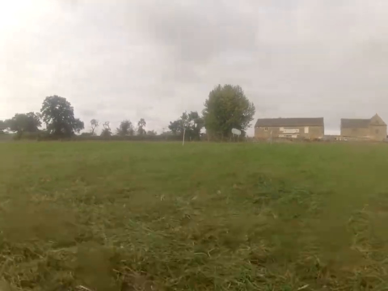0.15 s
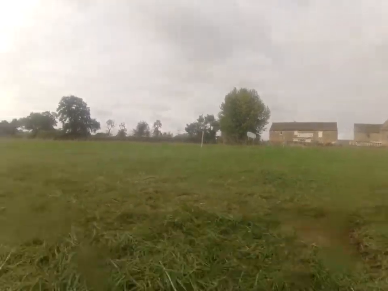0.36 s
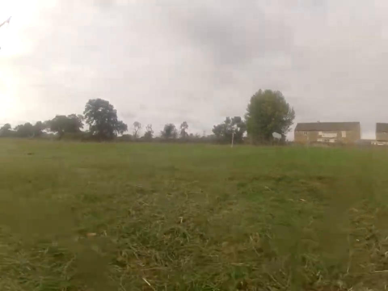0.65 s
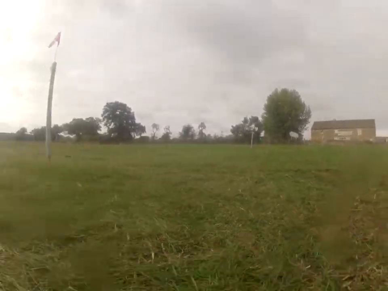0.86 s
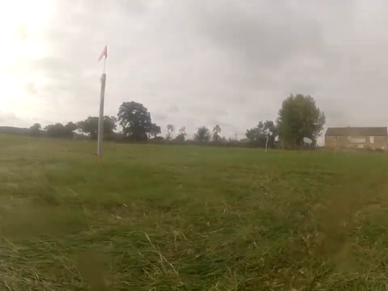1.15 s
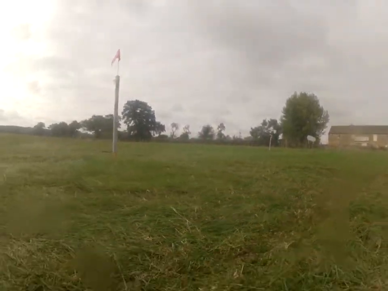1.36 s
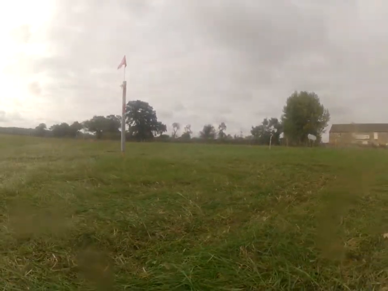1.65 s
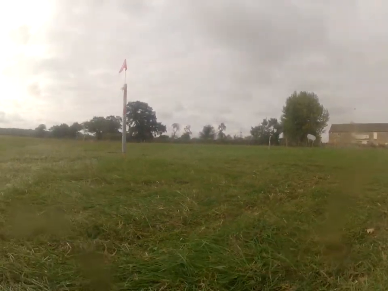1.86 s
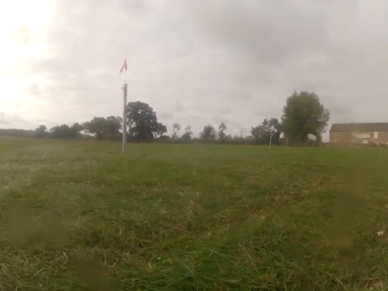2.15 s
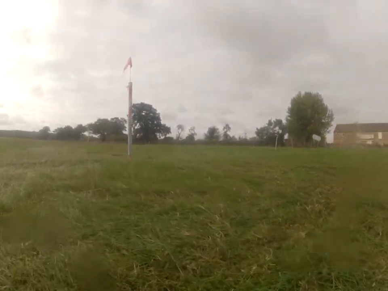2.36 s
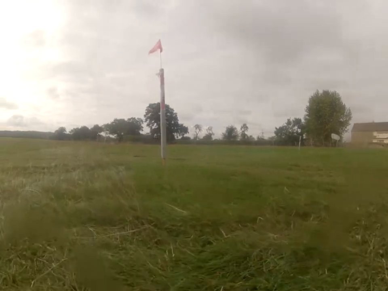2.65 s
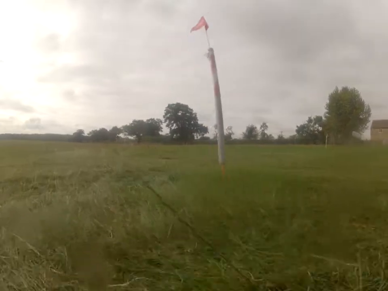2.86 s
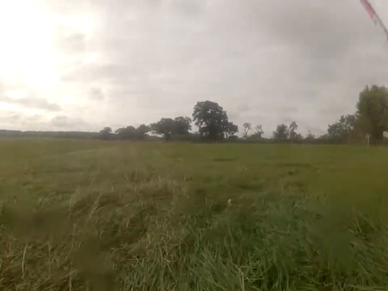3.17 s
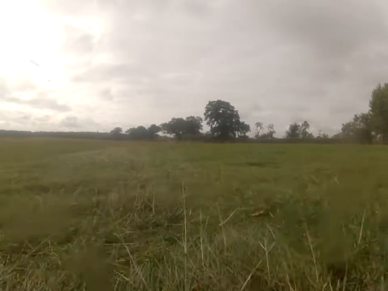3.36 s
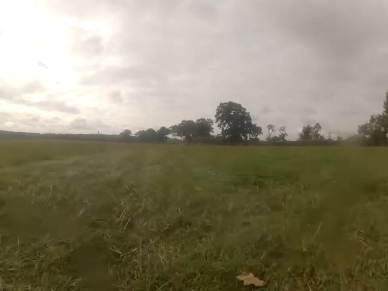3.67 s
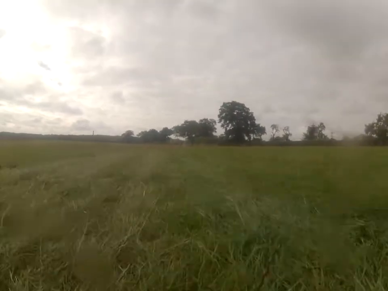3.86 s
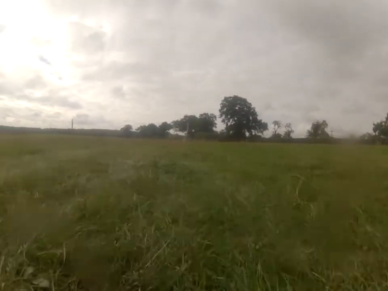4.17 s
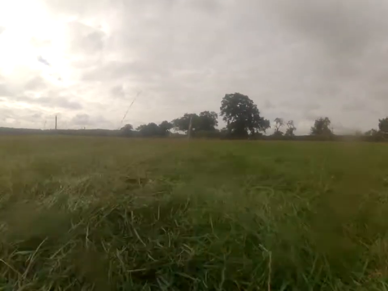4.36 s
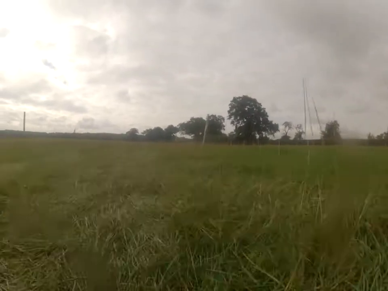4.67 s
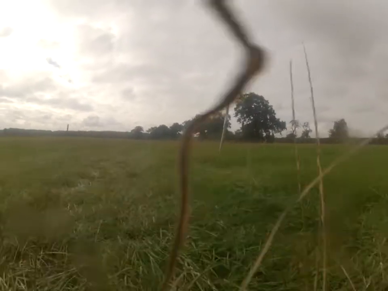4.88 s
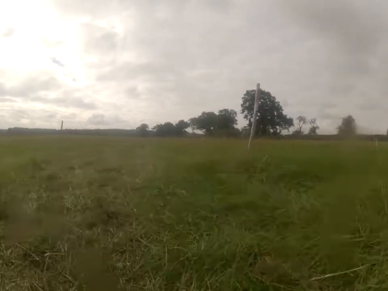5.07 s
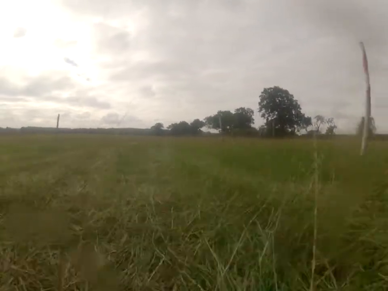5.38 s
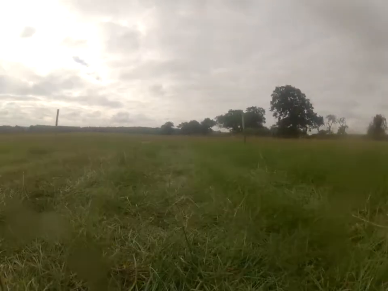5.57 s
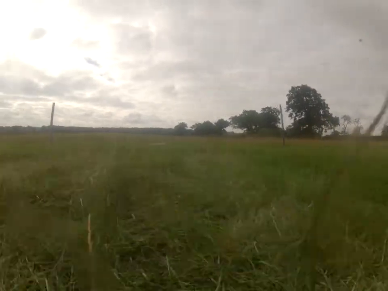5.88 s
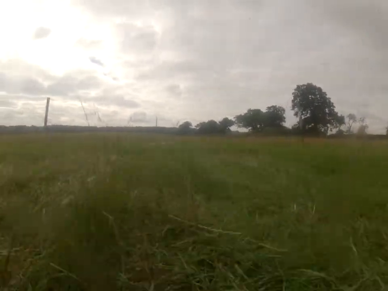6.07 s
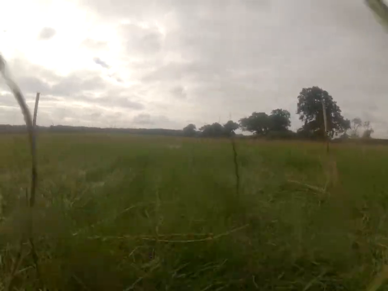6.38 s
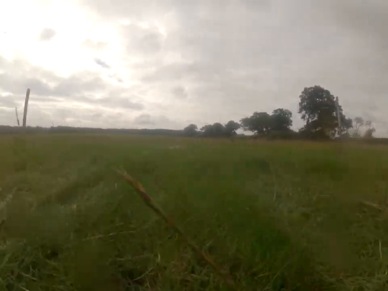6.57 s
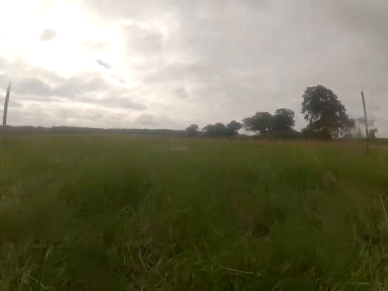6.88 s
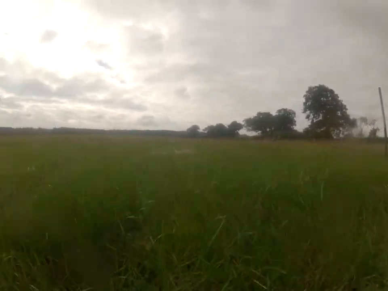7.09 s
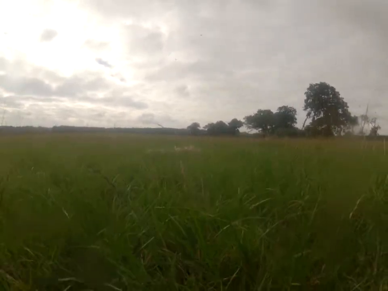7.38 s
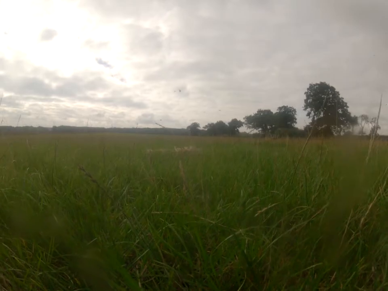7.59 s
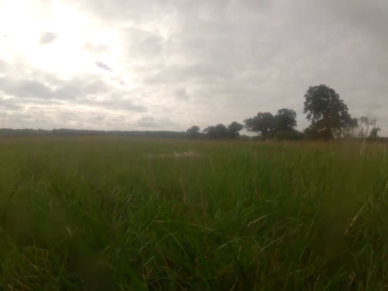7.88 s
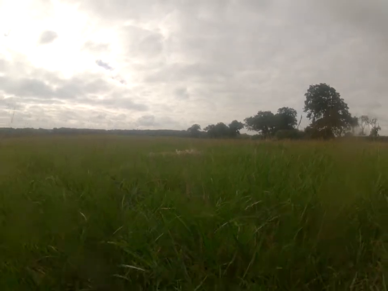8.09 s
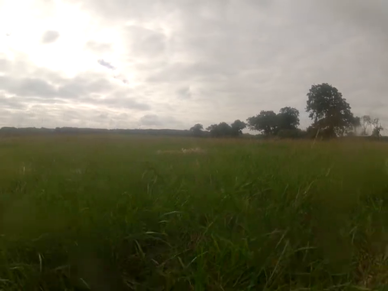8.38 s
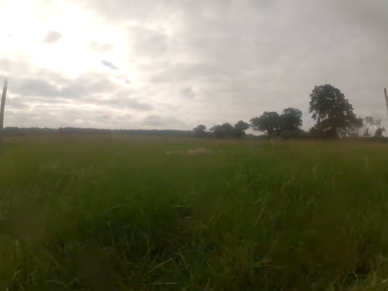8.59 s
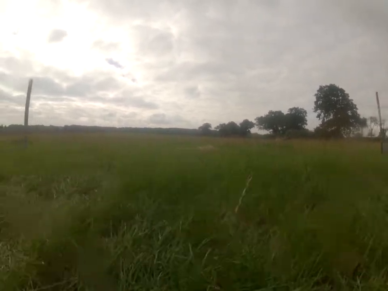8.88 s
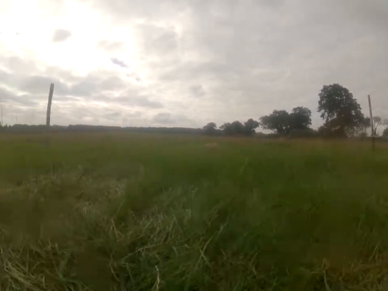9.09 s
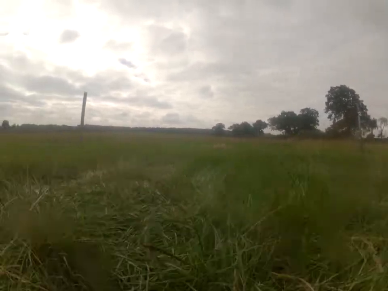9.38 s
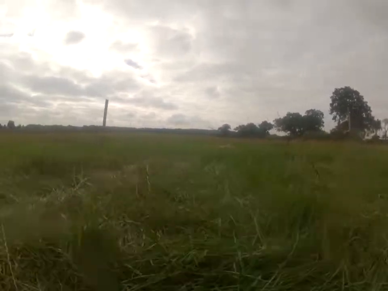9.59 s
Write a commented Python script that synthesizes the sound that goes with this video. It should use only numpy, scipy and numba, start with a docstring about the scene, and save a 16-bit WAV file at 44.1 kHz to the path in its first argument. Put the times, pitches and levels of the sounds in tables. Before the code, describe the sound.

A car drives over bumpy grass, its engine revving twice amid low rumble, sharp stalk cracks on the microphone and brief squeaks.

```python
"""A bumpy grass field, heard from a small camera in a plastic housing, low on a hard-driven car.
The ground rumbles, grass brushes and whips the housing, a dry joint squeaks and bumps thump.
Over this the engine revs twice and booms in the body panels. The camera turns its gain down on
loud cracks and holds each sample of a 12 kHz stream, which mirrors the sound in the treble."""
import sys
import numpy as np
from scipy import signal
from scipy.io import wavfile
from scipy.ndimage import uniform_filter1d
from numba import njit

SR = 44100
rng = np.random.default_rng(int(sys.argv[2]) if len(sys.argv) > 2 else 0)


def put_to_file(sound):
    """Save the sound as 16-bit audio at rate SR, in the file named by the first command-line argument."""
    columns = np.atleast_2d(sound).T  # one column per channel
    safe = np.clip(columns, -1, 1)
    whole_steps = np.round(safe * 32767)
    wavfile.write(sys.argv[1], SR, whole_steps.astype(np.int16))


N = 429534
T = np.arange(N) / SR


def undb(db):
    """dB to gain."""
    return 10 ** (np.asarray(db) / 20)


def unit(x):
    """Scale to rms 1."""
    return x / np.sqrt(np.mean(x ** 2))


def fader(points):
    """Gain curve through (time [s], level [dB]) points."""
    return undb(np.interp(T, *np.transpose(points)))


def walk(rate_hz):
    """Smooth random drift with a spread near 1."""
    k = int(SR / rate_hz)
    steps = np.repeat(rng.standard_normal(N // k + 1), k)
    return 1.3 * uniform_filter1d(uniform_filter1d(steps, k), k)[:N]


def add(out, start_s, x):
    """Mix x into out from start_s."""
    i = int(start_s * SR)
    out[i:i + len(x)] += x[:len(out) - i]


@njit
def bandpass(x, hz, width_hz):
    """State-variable band-pass, gain 1 at the centre."""
    y, band, low = np.empty(len(x)), 0., 0.
    g, damping = np.tan(np.pi * hz / SR), width_hz / hz
    for i in range(len(x)):
        v = (band + g * (x[i] - low)) / (1 + g * (g + damping))
        band, low, y[i] = 2 * v - band, low + 2 * g * v, damping * v
    return y


def ring(x, modes, tilt_db=0.):
    """Play x through resonances, neighbours in opposite polarity; tilt is per octave."""
    return sum((-1) ** k * undb(db + tilt_db * np.log2(hz / 1800)) * bandpass(x, float(hz), float(width))
               for k, (hz, width, db) in enumerate(modes))


# Plastic housing resonances: (frequency [Hz], width [Hz], level [dB])
HOUSING_MODES = [(427, 107, -7), (666, 68, -5), (1018, 255, -2.5), (1300, 292, -1.5), (1767, 216, -1),
                 (2362, 249, -3), (3055, 355, -10.5), (3843, 383, -12.5), (5310, 330, -22)]
def housing(x, tilt_db=0.):
    """The camera's shell gives whatever touches it a hollow plastic colour."""
    return ring(x, HOUSING_MODES, tilt_db)


def coasting_gears(from_hz=990, to_hz=760, sag_s=.45, fade_s=.7):
    """A faint gear tone sinks and fades as the car rolls out."""
    hz = to_hz + (from_hz - to_hz) * np.exp(-T / sag_s)
    level = undb(-56 + 2.5 * walk(15)) * np.exp(-(T / fade_s) ** 2)
    return level * np.sin(2 * np.pi * np.cumsum(hz) / SR)


# Bed of air and grass on the housing: (time [s], level [dB])
RUSTLE_LEVELS = [(0.0, -39.5), (0.54, -43.5), (1.57, -45), (4.4, -29.5), (4.9, -32), (5.1, -37.5),
                 (5.42, -39), (6.02, -40), (7.2, -43), (7.45, -43.5), (7.62, -49.5), (8.06, -38.5),
                 (9.74, -46)]
def rustle_and_buzz(shake):
    """Gain of the noise bed: the rustle and the engine's shaking add in power."""
    return np.hypot(shake, fader(RUSTLE_LEVELS))


def housing_buzz(revving, cycle):
    """The shaken housing hisses: bright and pulsing under throttle, fluttering when coasting."""
    pulse = 1 + revving * (.056 * np.cos(cycle) + .13 * np.cos(4 * cycle))
    hiss = rng.standard_normal(N) * pulse * undb((2.2 - .8 * revving) * walk(40))
    intake = undb(-24) * unit(bandpass(bandpass(hiss, 4620., 820.), 5290., 630.))
    loaded = unit(housing(hiss, tilt_db=.5)) + intake
    return revving * loaded + (1 - revving) * unit(housing(hiss))


# Rumble of ground and wind: (time [s], level [dB])
RUMBLE_LEVELS = [(0.0, -26.5), (0.92, -27.5), (1.0, -9.5), (1.41, -30), (1.57, -21.5), (2.55, -44),
                 (3.09, -30), (3.55, -17.5), (4.09, -21), (4.26, -12.5), (4.58, -16), (5.24, -13),
                 (5.56, -25), (5.78, -21), (5.99, -29.5), (7.02, -41.5), (7.59, -26.5), (7.81, -37),
                 (7.89, -25), (8.57, -17.5), (9.03, -37), (9.74, -23)]
def ground(buzz_gain):
    """The ride shakes the car: a soft sub rumble, and a harder judder that also follows the buzz."""
    rumble = fader(RUMBLE_LEVELS)
    soft = unit(bandpass(rng.standard_normal(N), 47.7, 31.5))
    hard = unit(bandpass(rng.standard_normal(N), 156., 162.)) * undb(3.2 * walk(28))
    return rumble * soft + np.hypot(undb(6) * buzz_gain, undb(-12.5) * rumble) * hard


def blade_crackle(strikes_per_s=220, decay_s=.002):
    """A hail of uneven grass strikes, each ringing its own blend of housing resonances."""
    strikes = np.flatnonzero(rng.random(N) < strikes_per_s / SR)
    size_db = 4.5 * np.minimum(rng.exponential(size=len(strikes)), 3)
    scrape = bandpass(rng.standard_normal(N), 1600., 2000.)
    crackle = np.zeros(N)
    for mode in HOUSING_MODES:
        hits = np.zeros(N)
        hits[strikes] = undb(size_db + 4 * rng.standard_normal(len(strikes)))
        grains = signal.lfilter([1], [1, -np.exp(-1 / (decay_s * SR))], hits)
        crackle += ring(grains * scrape, [mode])
    return unit(crackle)


# Passes through tufts: (start [s], end [s], level [dB], share of soft swish [0-1])
TUFT_PASSES = [(0.986, 1.088, -28.5, 0.38), (4.316, 4.337, -20, 0.64), (4.456, 4.526, -20.5, 0.24),
               (4.561, 4.578, -17, 0.55), (4.713, 4.763, -26.5, 0.15), (4.789, 4.947, -19, 0.4),
               (4.965, 4.981, -22.5, 0.5), (5.342, 5.403, -21.5, 0.52), (5.43, 5.532, -21.5, 0.42),
               (5.551, 5.575, -20, 0.36), (5.957, 6.049, -28.5, 0.44), (6.243, 6.436, -38.5, 0.2),
               (6.477, 6.512, -27, 0.15), (6.626, 6.755, -34.5, 0.44), (7.248, 7.397, -24.5, 0.52),
               (9.265, 9.526, -29, 0.48), (9.667, 9.75, -28, 0.34)]
def grass(edge_s=.014, long_from_s=4.3, long_to_s=6.8):
    """Tufts brush by with crackle and swish; in the long grass, blades tick through the rustle."""
    crackle = blade_crackle()
    swish = unit(housing(rng.standard_normal(N) * undb(.64 * walk(67)), tilt_db=2))
    long_grass = (T > long_from_s) & (T < long_to_s)
    out = long_grass * fader(RUSTLE_LEVELS) * undb(-3) * crackle
    for start, end, db, soft in TUFT_PASSES:
        fade_s = edge_s + .25 * (end - start)
        swell = np.clip(np.minimum((T - start) / edge_s, (end - T) / fade_s) + .5, 0, 1)
        out += undb(db) * swell * (soft * swish + (1 - soft) * crackle)
    return out


# Slips of a dry joint: (time [s], level [dB], pitch [Hz], decay [s])
JOINT_SLIPS = [(1.3264, -21, 1527, 0.021), (5.12, -20.5, 1545, 0.019), (5.687, -23.5, 1585, 0.021),
               (7.149, -24.5, 1564, 0.052), (7.251, -31, 1540, 0.11), (7.359, -22, 1570, 0.028),
               (7.475, -34.5, 1580, 0.018), (7.994, -17, 1530, 0.024), (8.117, -18.5, 1527, 0.029),
               (8.236, -22.5, 1587, 0.017), (8.29, -33, 1580, 0.034), (8.342, -32, 1530, 0.034),
               (8.772, -19.5, 1566, 0.031)]
def squeaks(octave_db=-14.5, chatter_hz=55):
    """A stick-slip tone and its octave swell fast and stutter as they die."""
    out, flutter = np.zeros(N), undb(1.2 * walk(150))
    for start, db, hz, decay in JOINT_SLIPS:
        t = T[:int(4 * decay * SR)]
        swell = np.minimum(t / .0047, 1) ** 2 * np.exp(-(t / decay) ** 3)
        chatter = .9 + .1 * np.cos(2 * np.pi * chatter_hz * (t - .01))
        phase = 2 * np.pi * hz * (t - .000072 * (1 - np.exp(-t / .03)))  # starts a hair flat
        tone = np.sin(phase) + undb(octave_db) * np.sin(2 * phase)
        add(out, start - .009, undb(db) * swell * chatter * tone)
    return out * flutter


# Wheels on ridges: (time [s], thud level [dB], thud pitch [Hz], shudder decay [s], rattle level [dB])
RIDGE_HITS = [(0.966, -12.5, 46.7, 0.048, -45.5), (1.199, -25.5, 186, 0.058, -57),
              (7.279, -23.5, 139, 0.12, -48.5), (7.56, -11, 136, 0.052, -38.5),
              (7.84, -33.5, 58, 0.009, -50.5)]
def bumps(kick=12.7):
    """Each ridge sends a kick and shudder to the body panels and a dull rattle to the housing."""
    thud, rattle, t = np.zeros(N), np.zeros(N), T[:SR // 2]
    for start, db, hz, shudder, rattle_db in RIDGE_HITS:
        jolt = rng.standard_normal(len(t)) * np.exp(-t / shudder)
        add(rattle, start, undb(rattle_db) * unit(housing(jolt, tilt_db=-6)))
        jolt[0] = kick
        band = float(hz), 1.05 * hz
        add(thud, start, undb(db) * unit(bandpass(bandpass(jolt, *band), *band)))
    return thud, rattle


# Stalks on the housing: (time [s], crack peak [dB], brightness [dB/octave])
STALK_HITS = [(0.982, -14.5, 2), (1.023, -3, 0.5), (1.068, -11, 2), (1.083, -21, -3), (1.177, -23, -3),
              (1.188, -20, 0.5), (2.983, -7, 7), (3.994, 1, 0), (4.175, -9.5, -6.5), (4.249, -11, 0),
              (4.34, 1.5, 2), (4.427, -9.5, -1.5), (4.461, -10.5, -6), (4.497, -4.5, -6.5),
              (4.517, 6, -9.5), (4.559, -9, -4.5), (4.594, 14.5, 0.5), (4.721, -5, -0.5), (4.794, -7, -8.5),
              (4.853, -6.5, 0.5), (4.879, -13, -3), (4.907, -3, 8), (4.964, -9, 8.5), (5.03, -16.5, -11),
              (5.158, -15.5, -4), (5.191, -14.5, -3), (5.239, -16.5, 2), (5.287, -18, -3), (5.369, -1.5, 7),
              (5.443, -17, 4), (5.496, -1.5, 6.5), (5.565, -5.5, -1.5), (5.571, 2, 5.5), (5.628, -20, 1),
              (5.65, -9.5, -5), (5.716, -18, -3.5), (5.746, -19, -1), (5.761, -22, -2), (5.836, -18, 4),
              (5.894, -21, 4), (5.912, 3, 4.5), (5.961, -17, 0), (6.091, -14, 4), (6.138, -14, 4.5),
              (6.158, -6, -4), (6.265, -10, 8.5), (6.409, -12.5, 8), (6.43, 3, 4.5), (6.544, -4.5, 2.5),
              (6.592, -10.5, 5.5), (6.665, -15, 6.5), (6.723, -13.5, 0), (7.149, -7, 13), (7.197, -28, 2),
              (7.229, -25, 1), (7.326, -15.5, 4), (8.747, -10.5, 1), (9.17, -10.5, -3), (9.303, -4.5, 0),
              (9.327, -8.5, -4), (9.343, -8.5, -6.5), (9.381, -2.5, -2), (9.5, -12.5, -5),
              (9.514, -10.5, -4), (9.701, -11, -8), (9.726, -4, 3)]
def whips(attack_s=.0019, release_s=.0033, end_s=.0059, shove_hz=273.):
    """Each stalk scrapes its own spot; stiff ones snap bright, thick ones knock hollow."""
    out, t = np.zeros(N), T[:SR // 20]
    burst = np.clip(np.minimum(t / attack_s, (end_s - t) / release_s), 0, 1)
    spots_db = 2 * rng.standard_normal((len(STALK_HITS), len(HOUSING_MODES)))
    for (start, db, tilt_db), spot in zip(STALK_HITS, spots_db):
        scrape = bandpass(rng.standard_normal(len(t)) * burst, 1810., 2670.)  # light stalk, little bass
        modes = [(hz, width, level + shift) for (hz, width, level), shift in zip(HOUSING_MODES, spot)]
        crack = ring(scrape, modes, tilt_db) + undb(-27.5) * scrape
        add(out, start - .002, undb(db) * crack / np.abs(crack).max())
        # hard blows also shove the whole camera
        shove = bandpass(np.abs(scrape), shove_hz, 1.27 * shove_hz)
        add(out, start - .002, undb(-14.5 + 1.27 * db) * shove / np.abs(shove).max())
    return out


# Rev curves, one list per burst of throttle: (time [s], engine cycle rate [Hz])
REV_CURVES = [
    [(1.45, 12.5), (1.7, 13), (2.0, 19), (2.1, 20.8), (2.25, 22.55), (2.43, 22.4), (2.84, 24.93),
     (2.95, 24.6), (3.3, 19.4), (3.5, 19.3), (3.7, 21.5), (4.0, 24.3), (4.2, 23)],
    [(8.25, 12.5), (8.44, 12.7), (8.6, 14), (8.73, 17.9), (9.08, 22.4), (9.2, 23), (9.5, 22.2), (9.74, 20)],
]
def revs(fade_s=.2):
    """The engine's cycle rate, and a 0-1 gate that opens for each rev."""
    hz = np.interp(T, *np.vstack(REV_CURVES).T)
    revving = sum(np.clip(np.minimum(T - rev[0][0], rev[-1][0] + fade_s - T) / fade_s, 0, 1)
                  for rev in REV_CURVES)
    return hz, revving


# Engine effort: (time [s], level [dB])
THROTTLE_LEVELS = [(1.7, -29), (2.0, -15.5), (2.15, -21), (2.44, -18.5), (2.85, -13.5), (3.2, -24.5),
                   (3.4, -17.5), (3.6, -29), (3.9, -19), (4.2, -28), (8.45, -78), (8.65, -22), (9.2, -19.5),
                   (9.74, -30)]
def throttle(revving):
    """The throttle rides the level of the engine's tones."""
    return revving * fader(THROTTLE_LEVELS)


# Whine partials: (multiple of the cycle rate, level [dB])
WHINE_PARTIALS = [(28, -25), (44, -26), (96, -18), (144, -39), (168, -35), (192, -35), (240, -37)]
def whine(hz, cycle, pull_from_s=2.1, pull_to_s=2.52, pull_db=14):
    """Valve gear and gear teeth sing at high revs, their top partials only as the car pulls away."""
    pull = undb(pull_db) * np.clip(np.minimum(T - pull_from_s, pull_to_s - T) / .14 + .5, 0, 1)
    tones = sum(undb(db + 3.65 * walk(29.9)) * (pull if k > 100 else 1) * np.sin(k * cycle)
                for k, db in WHINE_PARTIALS)
    return (hz / hz.max()) ** 1.9 * tones


# Firing partials: (multiple of the cycle rate, level [dB])
FIRING_PARTIALS = [(2, -39), (3, 0.5), (4, 1.5), (5, -13), (6, -1.5), (7, -4), (8, -5.5), (9, -6),
                   (10, -19.5), (11, -13.5), (12, -7), (13, -11), (14, -36), (15, -22), (16, -9), (18, -13),
                   (19, -15.5), (20, -10.5)]
def firing(cycle, rough_db=2):
    """Four uneven firings a cycle make a growl of wavering harmonics."""
    return sum(undb(db + rough_db * walk(12)) * np.sin(k * cycle + rng.uniform(0, 2 * np.pi))
               for k, db in FIRING_PARTIALS)


# Body panel resonances: (frequency [Hz], width [Hz], level [dB])
PANEL_MODES = [(28.6, 17, -8.5), (46.8, 11.1, 1), (75.9, 8.8, 2.5), (97.9, 12.7, -2), (136.4, 27, -5.5),
               (210, 89, -8.5), (316, 890, -17)]
def body_panels(shaking):
    """The car's panels turn low shaking into boom."""
    return ring(shaking, PANEL_MODES)


def scene():
    """Low shaking booms through the panels; buzz, rattle and grass ring the housing."""
    hz, revving = revs()
    cycle = 2 * np.pi * np.cumsum(hz) / SR
    effort = throttle(revving)
    growl = effort * firing(cycle)
    gears = effort * whine(hz, cycle)
    shake = revving * undb(-27.5 + 13.5 * np.log2(hz / 23.5))  # grows with the revs
    buzz_gain = rustle_and_buzz(shake)
    thud, rattle = bumps()
    boom = body_panels(growl + ground(buzz_gain) + thud)
    bed = coasting_gears() + buzz_gain * housing_buzz(revving, cycle)
    return (bed + grass() + whips() + squeaks() + rattle + gears + boom)[None]


@njit
def gain_control(x, threshold, attack_s, release_s):
    """The camera ducks fast on peaks and lets go slowly."""
    y, envelope = np.empty(len(x)), 0.
    for i in range(len(x)):
        level = abs(x[i])
        envelope += (level - envelope) / (SR * (attack_s if level > envelope else release_s))
        y[i] = x[i] * threshold / max(envelope, threshold)
    return y


def record(dry, ceiling=.62, hold_hz=12000):
    """The camera ducks and rounds peaks, mirrors the sound upward by sample-and-hold, and cuts the top."""
    ducked = gain_control(dry[0], threshold=.48, attack_s=.0014, release_s=.07)
    rounded = ceiling * np.tanh(ducked / ceiling)
    stream = signal.resample_poly(rounded, hold_hz, SR)
    held = signal.resample_poly(np.repeat(stream, 4), SR, 4 * hold_hz)
    held = np.pad(held, (0, N))[:N]
    softened = signal.sosfilt(signal.butter(8, 15300, fs=SR, output="sos"), held)
    return signal.sosfilt(signal.ellip(8, .2, 70, 16500, fs=SR, output="sos"), softened)[None]


dry = scene()
out = record(dry)
put_to_file(out)
```